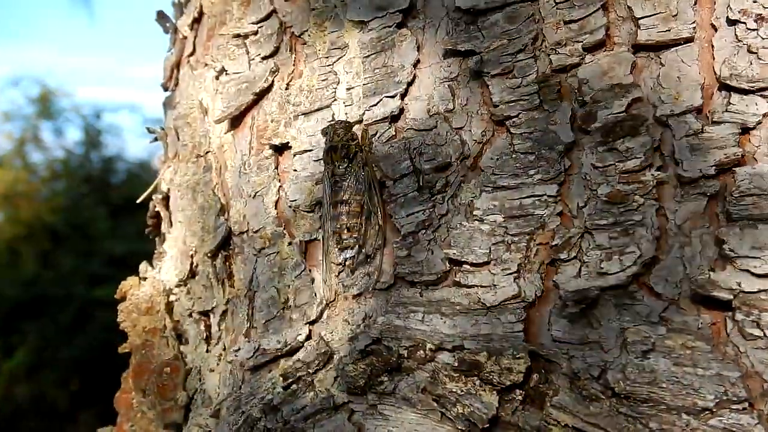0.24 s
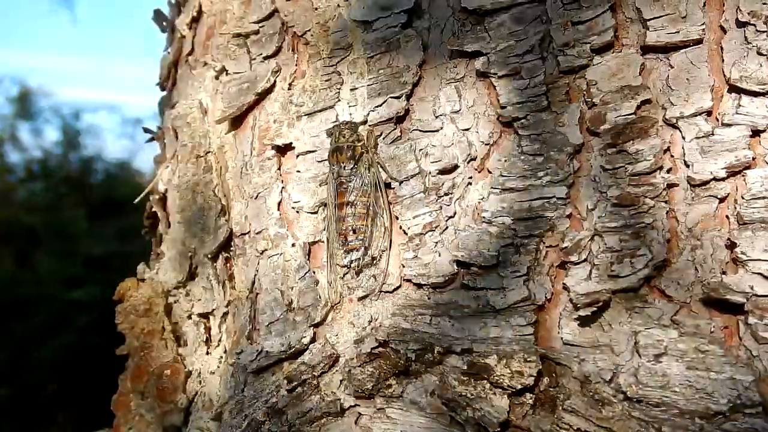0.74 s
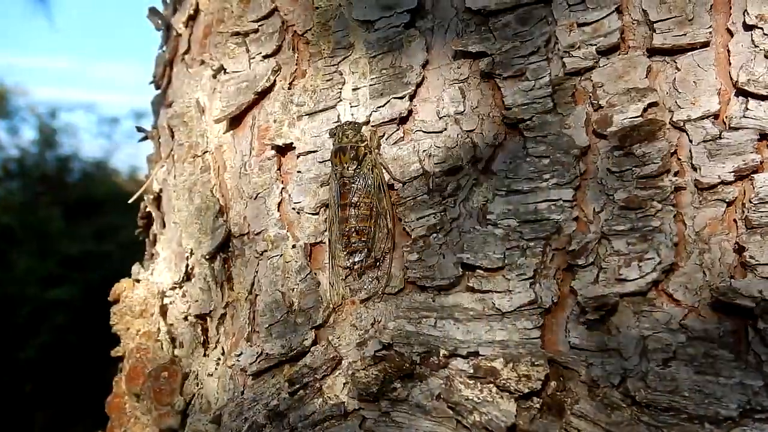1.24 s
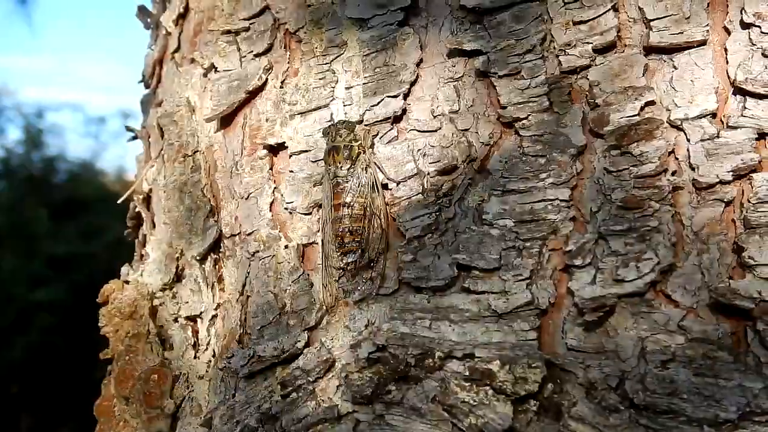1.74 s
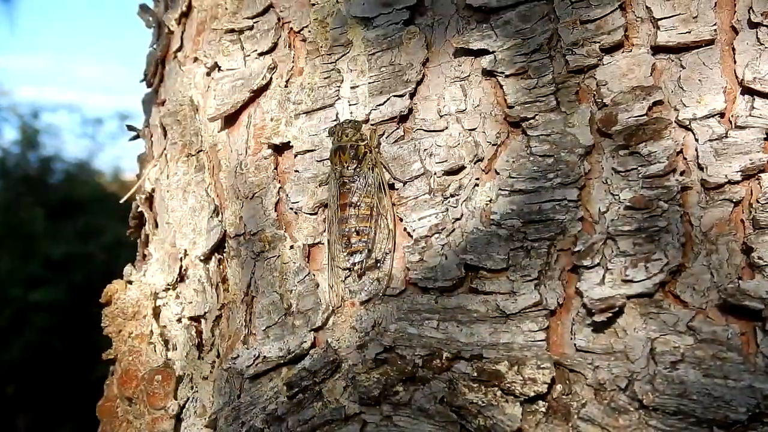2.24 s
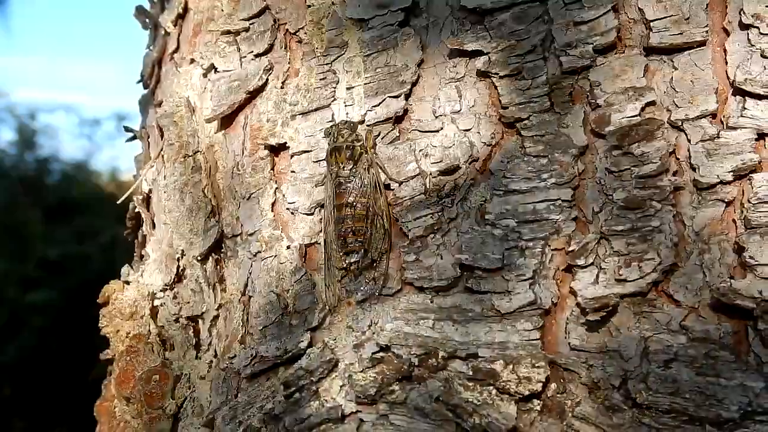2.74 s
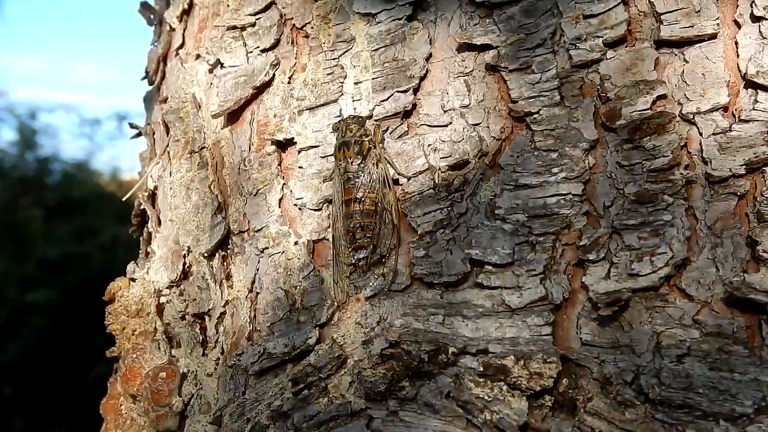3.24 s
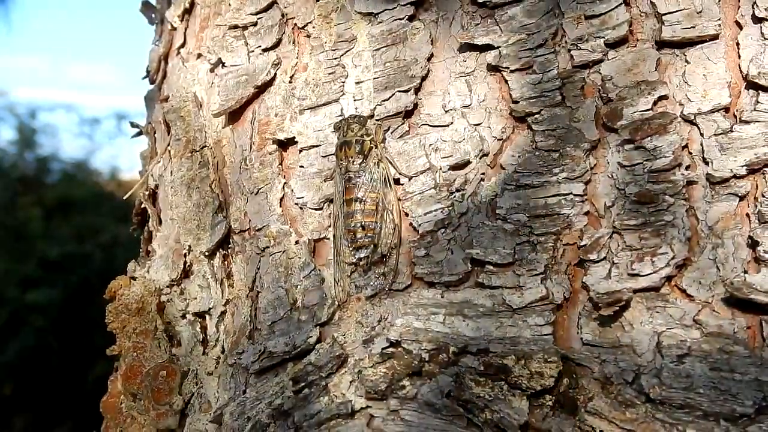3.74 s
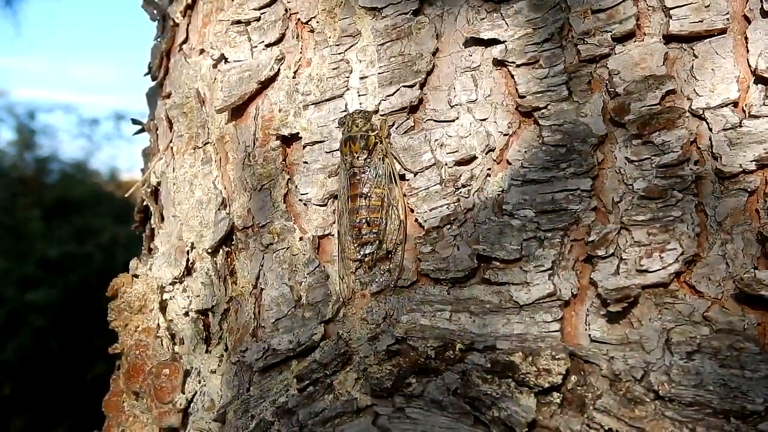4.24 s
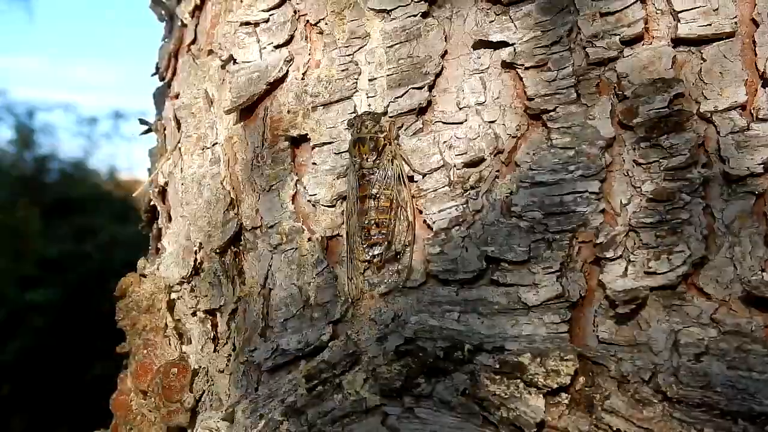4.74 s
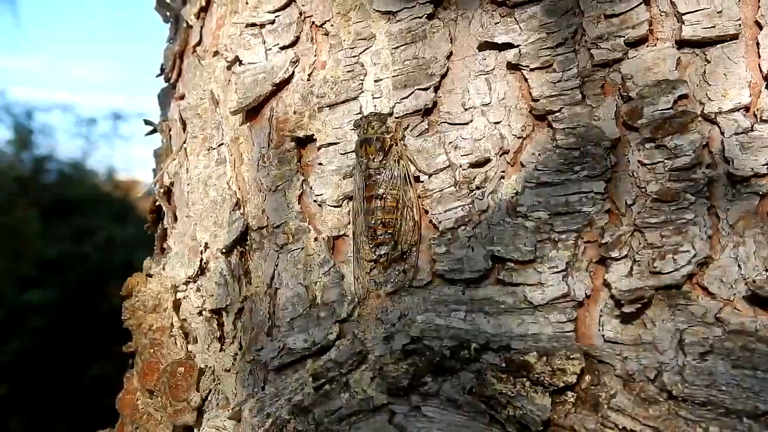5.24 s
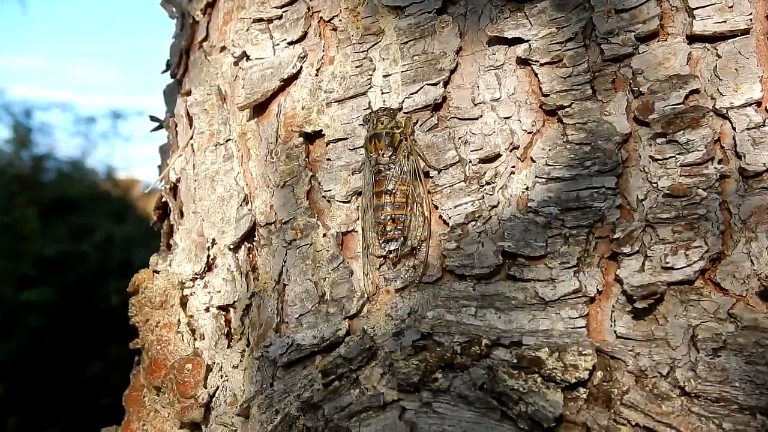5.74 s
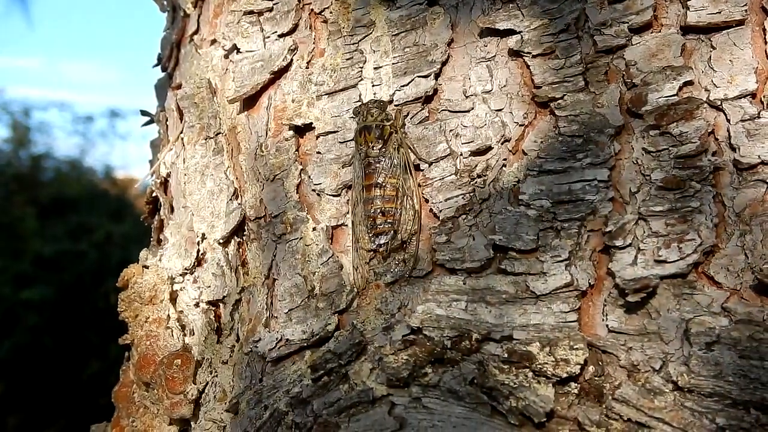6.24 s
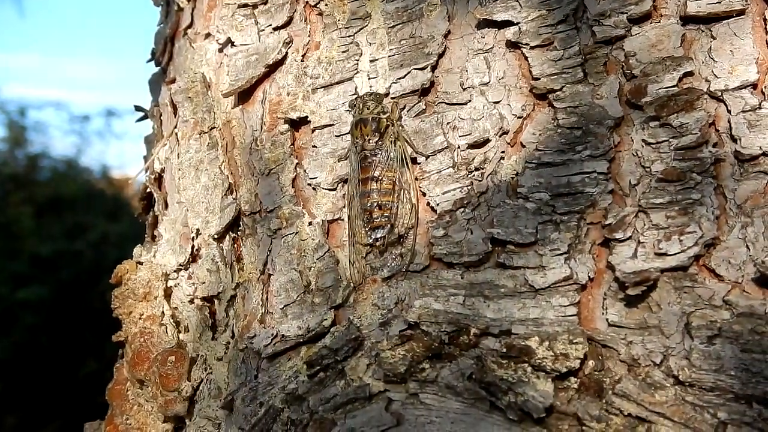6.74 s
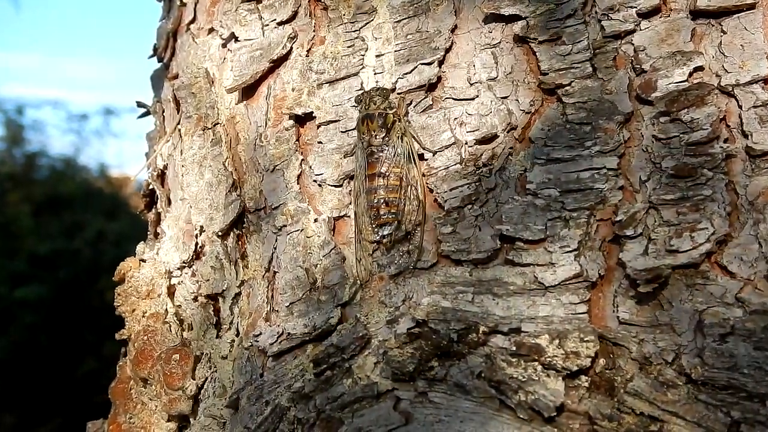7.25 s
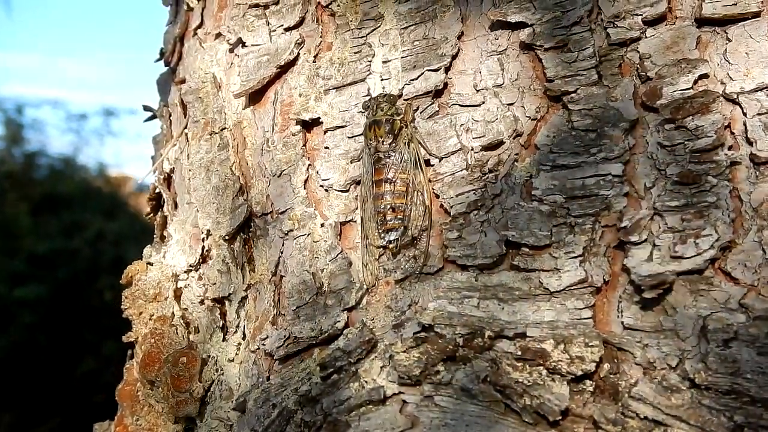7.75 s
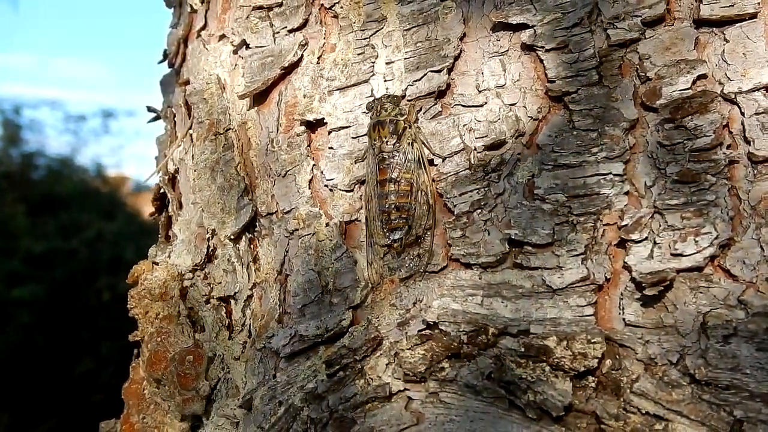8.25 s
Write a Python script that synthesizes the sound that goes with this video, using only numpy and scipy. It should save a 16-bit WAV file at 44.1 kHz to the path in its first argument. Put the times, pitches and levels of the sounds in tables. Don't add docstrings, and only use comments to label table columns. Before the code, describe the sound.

A single close cicada on a pine trunk rasps 21 short, bright, evenly spaced chirps over soft wind rumble and a faint far chorus.

```python
import sys
import numpy as np
from scipy import signal
from scipy.fft import irfft, next_fast_len
from scipy.io import wavfile

SR = 44100
rng = np.random.default_rng(int(sys.argv[2]) if len(sys.argv) > 2 else 0)


def decibels_to_gain(level_db):
    exponent = np.asarray(level_db, float) / 20
    return 10 ** exponent


def dump_mix(stems):
    frames = np.atleast_2d(stems).T
    limited = np.clip(frames, -1, 1)
    pcm = np.round(limited * 32767).astype(np.int16)
    wavfile.write(sys.argv[1], SR, pcm)


N = 374409

# (time [s], wait until first full buckle [s], buckles [count], level [dB])
CHIRPS = [(0.0526, 0.0224, 10, -21), (0.4208, 0.0238, 11, -21), (0.8221, 0.0235, 12, -21),
          (1.2154, 0.0211, 10, -21.5), (1.6177, 0.0229, 12, -21), (2.072, 0.0215, 12, -21),
          (2.5354, 0.0217, 11, -21), (2.9535, 0.0215, 12, -21), (3.3559, 0.0213, 12, -21),
          (3.752, 0.0211, 11, -20), (4.1628, 0.0207, 12, -20), (4.559, 0.0227, 11, -20),
          (4.9753, 0.0217, 12, -20.5), (5.3711, 0.0212, 11, -20.5), (5.7649, 0.0215, 12, -21),
          (6.1897, 0.0208, 11, -20), (6.571, 0.0200, 12, -21), (7.0014, 0.0206, 12, -20.5),
          (7.3886, 0.0205, 12, -20.5), (7.8198, 0.0206, 12, -20.5), (8.2531, 0.0212, 11, -21)]
# (time [ms], pitch [Hz], level [dB])
OPENING_TICKS = [(.6, 2520, -12.5), (3.8, 2490, -8.5), (5.0, 2400, -15), (6.2, 2550, -10),
                 (9.6, 2500, -13.5), (11.2, 3100, -16), (14.1, 2100, -12.5)]
# (time after first [ms], effort [dB], fundamental [dB])
BUCKLES = [(0.0, -7, -5.5), (7.17, -7.5, -11.5), (12.4, -3.5, -2.5), (18.8, -5.5, -8.5),
           (22.87, -0.5, -1.5), (31.24, -1.5, -4), (35.7, -1.4, -2.5), (41.8, -2, -5), (48.45, -0.5, -2),
           (55, -1.7, -7), (60.94, -1, -2.5), (69.2, -1.9, -7.5)]
# (time [ms], pitch [Hz], 1st, 2nd, 3rd harmonic [dB], rise [ms])
RIBS = [
    (-4.5, 2718, -25, -0.5, -31.5, .75),
    (-2, 2547, -12, 3.3, -21, .75),
    (-0.6, 2440, -19.5, 0.5, -10, .75),
    (1.02, 2141.5, -12, -2.5, -7, 1),
    (2, 2633, -27.5, -5.5, -25, .70),
]
CLOSING_POP = (3.0, 2500, -30, -6, -30, 1.8)
# (centre [Hz], width [Hz], level [dB])
AIR_SAC = [(5050, 49, -7.5), (4520, 83, -6.5), (2240, 260, -7.5), (2790, 150, -7)]
# (frequency [Hz], level [dB])
LEFT_PORT = [(1550, -6), (2920, 0.5), (3725, -20.5), (4236, 5), (4900, 4), (7440, 1), (8860, -4),
             (9300, -8)]
# (frequency [Hz], level difference [dB], left lead [rad])
PORT_PAIR = [(1550, -1.5, 0), (3000, -4, -.1), (3400, -11, -.6), (3800, -5, -.6), (4050, 1.5, 1.1),
             (5000, 3.1, .85), (7200, 8, 1.4), (7750, 22, 1.0)]
# (time [s], level [dB])
BREEZE = [(0.0, -51), (0.21, -65), (1.49, -56.5), (3.4, -75), (4.47, -71.5), (4.94, -77), (5.18, -69),
          (6.08, -77.5), (6.38, -63.5), (7.26, -74), (7.73, -62.5), (8.49, -72.5)]
# (time of peak [s], level [dB], fade [s], left-right [dB])
GUSTS = [(.05, -41.5, 0.14, 1), (.23, -51, 0.025, 2.5), (.35, -55, 0.075, -13), (.47, -43, 0.063, 0.5),
         (0.619, -55, 0.048, 5), (.72, -48, 0.036, -5), (0.858, -39.5, 0.091, -3),
         (1.121, -49.5, 0.11, 1.5), (1.27, -43, 0.046, -2.5), (1.479, -43, 0.061, 1),
         (1.62, -39, 0.14, -4.5), (1.82, -55, 0.021, -17), (2.04, -40.5, 0.084, 2), (2.139, -45, 0.036, -1),
         (2.38, -51.5, 0.069, -1), (2.51, -44.5, 0.1, -2.5), (2.88, -60.5, 0.16, -8),
         (2.988, -53, .06, -10), (4.41, -57.5, 0.071, -4), (4.66, -61.5, 0.068, -15.5),
         (5.03, -57, .11, -3.5), (5.24, -54.5, .06, -4), (5.42, -57, .13, -0.5), (5.8, -53, 0.081, -7),
         (6.34, -53.5, 0.25, 0), (6.57, -48.5, 0.12, -1.5), (7.61, -54.5, 0.058, -2),
         (7.88, -51.5, 0.067, 1), (8.139, -53.5, .08, -2), (8.298, -50, 0.073, -4.5)]
# (time [s], crack [dB], thud [dB], left-right [dB])
PUFFS = [(0.027, -61.5, -38, 6), (0.216, -53.5, -41, -4), (0.234, -52.5, -57, 12),
         (0.418, -52.5, -45.5, 16.5), (0.618, -50, -62, -5), (0.698, -61, -39, -1), (0.844, -47, -40, -14),
         (0.961, -67, -45, 0), (1.08, -47, -55, 6), (1.114, -49, -56, 7), (1.175, -50, -58, -10),
         (1.258, -49.5, -44.5, -12), (1.468, -71, -35.5, 4), (1.506, -60, -44, 16), (1.545, -69, -44, 21),
         (1.584, -59, -29, 0), (1.712, -53.5, -48.5, -8), (2.003, -34, -30.5, -3), (2.022, -39, -34.5, -4),
         (2.338, -50, -48, 3), (2.389, -54.5, -52, 1), (2.463, -66, -42, -13), (2.487, -58, -43, -2),
         (4.375, -60, -42.5, -2), (6.548, -44, -47, -5)]
# (frequency [Hz], density [dB per Hz])
HAZE = [(18, -20), (30, -13), (85, -14), (117, -4.5), (155, -2.5), (193, -4.5), (406, -7.5), (537, -4),
        (1060, -7), (2100, -17), (2510, -16), (3600, -37.5), (5000, -70)]
# (frequency [Hz], density [dB per Hz])
CHORUS = [(3300, -28.5), (3900, -18), (4400, -10.5), (5000, -1.8), (5800, -9), (6500, -14), (7500, -24.5),
          (9500, -26.5), (15700, -30.5)]
# (frequency [Hz], correlation [-1..1])
LIKENESS = [(60, 0.3), (140, 0.29), (310, 0.21), (700, 1), (1580, 0.18), (3580, 0.58), (8120, 0.087)]
# (frequency [Hz], left-right [dB])
BACKGROUND_PAN = [(60, 5.5), (160, -5), (430, -1.5), (1140, -4), (3040, -5), (8120, 5.5)]
# (centre [Hz], width [Hz], depth [0..1])
DEAD_SPOTS = [(2500, 260, .95), (4730, 80, .4), (5000, 52, .68), (7500, 70, .55)]

HAZE_DB, CHORUS_DB = -66, -79.5
BREEZE_LIFT_DB, BREEZE_SIDE_DB, SWAY_DB = 1, -2.5, 1
GUST_FADE_DB = 17
QUICKENS_PER_S = 0.0022
TICK_WAIT_S = .0198
BRIGHTENS_DB_PER_DB = .8
PEAK_LIMIT = .36


def at_hz(points, hz, axis=1):
    points = np.array(points)
    return np.interp(np.log(hz), np.log(points[:, 0]), points[:, axis])


def rms_one(x):
    return x / np.sqrt(np.mean(x ** 2) + 1e-20)


def pan(db):
    return decibels_to_gain(np.array([db / 2, -db / 2]))


def drift(rate_hz):
    r = np.exp(-80 * np.pi * rate_hz / SR)
    white = rng.standard_normal(N // 40 + 2002)
    slow = signal.lfilter([1], [1, -2 * r, r * r], white)[2000:]
    return np.interp(np.arange(N) / 40, np.arange(len(slow)), rms_one(slow))


def resonance(x, hz, width_hz):
    r = np.exp(-np.pi * width_hz / SR)
    poles = [1, -2 * r * np.cos(2 * np.pi * hz / SR), r * r]
    return signal.lfilter([(1 - r * r) / 2, 0, (r * r - 1) / 2], poles, x)


def bandpass(x, low_hz, high_hz):
    return signal.sosfilt(signal.butter(2, [low_hz, high_hz], "band", fs=SR, output="sos"), x)


def bursts(rows, jitter_ms, jitter_db, detune):
    s, hz, *levels_db, rise_ms = np.transpose(rows)[:, :, None]
    chance = rng.standard_normal((len(rows), 4)).T[:, :, None]
    age_s = np.arange(int(5 * rise_ms.max() * SR / 1000)) / SR
    x = age_s / (rise_ms / 1000)
    swell = (x * np.exp(1 - x)) ** 3
    phase = 2 * np.pi * hz * (1 + detune * chance[0]) * age_s + 10 * chance[1]
    tone = sum(decibels_to_gain(db) * np.sin(k * phase) for k, db in enumerate(levels_db, 1))
    start = ((s + (jitter_ms * chance[2] - rise_ms) / 1000) * SR).astype(int)
    out = np.zeros(N + len(age_s))
    np.add.at(out, start + np.arange(len(age_s)), decibels_to_gain(jitter_db * chance[3]) * swell * tone)
    return out[:N]


def banded_noise(spectrum, patchy_db):
    out, together = 0, drift(1.0)
    low_end, high_end = spectrum[0][0], spectrum[-1][0]
    edges = np.geomspace(low_end, high_end, round(3 * np.log2(high_end / low_end)) + 2)
    white = rng.standard_normal((2, 2, N))
    for k, (low, high) in enumerate(zip(edges, edges[1:])):
        mid, side = bandpass(white[k % 2], low, high)
        hz = np.sqrt(low * high)
        alike = np.clip(at_hz(LIKENESS, hz), -1, 1)
        gain = decibels_to_gain(at_hz(spectrum, hz) + patchy_db * (0.71 * together + drift(7.0)))
        pair = np.sqrt(1 + alike) * mid + np.sqrt(1 - alike) * side * [[1], [-1]]
        out = out + gain * pair * pan(at_hz(BACKGROUND_PAN, hz))[:, None]
    return rms_one(out)


def background():
    haze = decibels_to_gain(HAZE_DB) * banded_noise(HAZE, patchy_db=1.7)
    chorus = decibels_to_gain(CHORUS_DB) * banded_noise(CHORUS, patchy_db=.3)
    return haze + chorus


def gusting():
    time_s = np.arange(N) / SR
    coarse_s = np.arange(0, N, 64) / SR
    power = 0
    for s, db, fade_s, lr_db in GUSTS:
        away = np.abs(coarse_s - s) / fade_s
        power = power + (decibels_to_gain(db - GUST_FADE_DB * away) * pan(lr_db)[:, None]) ** 2
    gusts = np.array([np.interp(time_s, coarse_s, side) for side in power])
    breeze_db = np.interp(time_s, *np.transpose(BREEZE))
    breeze = decibels_to_gain(breeze_db + BREEZE_LIFT_DB) * pan(BREEZE_SIDE_DB + SWAY_DB * drift(2.5))
    return np.sqrt(breeze ** 2 + gusts)


def puffs():
    out = []
    for sign in (.5, -.5):
        rows = []
        for s, crack_db, thud_db, lr_db in PUFFS:
            thud, crack = thud_db + sign * lr_db, crack_db + sign * lr_db
            rows.append((s + 0.0029, 200, thud, crack - 1.0, crack - 10.5, crack - 11.0, crack - 13.0, 3.2))
        out.append(bursts(rows, jitter_ms=1.5, jitter_db=1.5, detune=.12))
    return np.array(out)


def wind():
    sizes = decibels_to_gain(3.0 * np.minimum(rng.exponential(1, (3, N)), 4)) * rng.choice([-1, 1], (3, N))
    lumps = sizes * (rng.random((3, N)) < 95 / SR)
    rounding = signal.butter(2, 480, fs=SR, output="sos")
    lumps = signal.sosfilt(rounding, lumps[:2] + 0.42 * lumps[2] + 1e-18)
    thud = resonance(resonance(lumps, 160, 110), 200, 340)
    brush = resonance(resonance(lumps, 250, 540), 390, 900)
    out = gusting() * (rms_one(thud) + decibels_to_gain(-13.0) * rms_one(brush)) + puffs()
    bass_cut = signal.butter(2, 95, "high", fs=SR, output="sos")
    return signal.sosfilt(bass_cut, out)


def rib_snap(rib, at_s, low_db, loud_db, bright_db):
    ms, hz, first_db, second_db, third_db, rise_ms = rib
    return at_s + ms / 1000, hz, low_db + first_db, loud_db + second_db, bright_db + third_db, rise_ms


def cicada():
    ticks, snaps = [], []
    for s, wait_s, count, level_db in CHIRPS:
        peak_db, stretch = level_db + 7.5, 1 - QUICKENS_PER_S * s
        for ms, hz, db in OPENING_TICKS:
            at_s = s + ms / 1000 * np.sqrt(wait_s / TICK_WAIT_S)
            tick_db = peak_db + db
            ticks.append((at_s, hz, tick_db - 15.0, tick_db, tick_db - 21.5, .65))
        for ms, effort_db, belly_db in BUCKLES[:count]:
            at_s, loud_db = s + wait_s + ms * stretch / 1000, peak_db + effort_db
            bright_db = loud_db + BRIGHTENS_DB_PER_DB * effort_db + 1.5
            snaps += [rib_snap(rib, at_s, peak_db + belly_db, loud_db, bright_db) for rib in RIBS]
        if count % 2:
            snaps.append(rib_snap(CLOSING_POP, at_s, loud_db, loud_db, loud_db))
    song = bursts(ticks, jitter_ms=.1, jitter_db=1.5, detune=.014)
    song = song + bursts(snaps, jitter_ms=.12, jitter_db=1.0, detune=.010)
    song = song + sum(decibels_to_gain(db) * resonance(song, hz, width_hz) for hz, width_hz, db in AIR_SAC)
    envelope = np.abs(signal.hilbert(song, next_fast_len(N))[:N])
    relative_level = envelope / PEAK_LIMIT + 1e-9
    return song * np.tanh(relative_level) / relative_level


def ports(x):
    hz = np.maximum(np.arange(257) * SR / 512, 1)
    turn = np.exp(.5j * at_hz(PORT_PAIR, hz, axis=2))
    left_db = at_hz(LEFT_PORT, hz)
    right_db = left_db - at_hz(PORT_PAIR, hz)
    gains = np.array([decibels_to_gain(left_db) * turn, decibels_to_gain(right_db) / turn])
    response = np.roll(irfft(gains, 512), 256, axis=1) * np.hanning(513)[:512]
    return signal.fftconvolve(x[None], response, axes=1)[:, 256:N + 256]


def capsules(near):
    square = near ** 2 * decibels_to_gain(np.array([[-25.0], [-9.0]]))
    below = bandpass(square, 300, 2600) + decibels_to_gain(-4.0) * bandpass(square, 130, 450)
    fizz = decibels_to_gain(np.array([[-59.0], [-53.0]])) * near * rng.standard_normal((2, N))
    treble = signal.butter(4, 9300, "high", fs=SR, output="sos")
    return near + below + signal.sosfilt(treble, decibels_to_gain(-20.5) * square + fizz)


def trees(x):
    age_s = np.arange(SR // 2) / SR
    quick_t60_s, long_t60_s = .085, .45
    fall = decibels_to_gain(-46.5 - 60 * age_s / quick_t60_s) + decibels_to_gain(-77.0 - 60 * age_s / long_t60_s)
    tail = rng.standard_normal((2, len(age_s))) * fall * (age_s > .003)
    return signal.fftconvolve(x[None], tail, axes=1)[:, :N]


def scene():
    song = cicada()
    return capsules(ports(song)) + trees(song) + wind() + background()


def band_limit(x):
    return signal.sosfilt(signal.butter(12, 15750, fs=SR, output="sos"), x)


def record(dry):
    for hz, width_hz, depth in DEAD_SPOTS:
        dry = dry - depth * resonance(dry, hz, width_hz)
    return band_limit(dry)


dry = scene()
out = record(dry)
dump_mix(out)
```